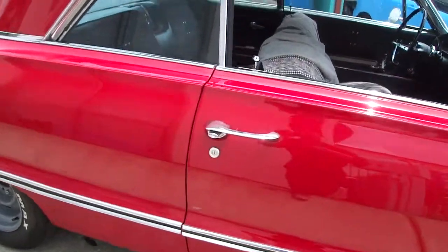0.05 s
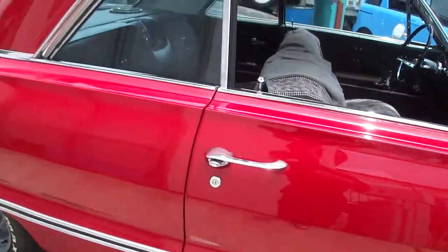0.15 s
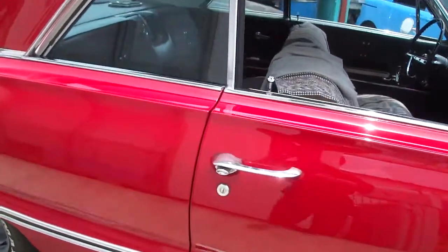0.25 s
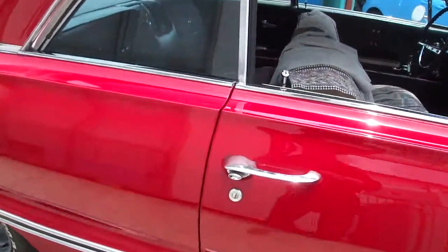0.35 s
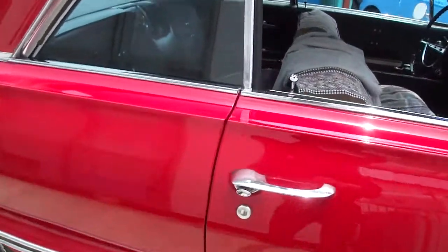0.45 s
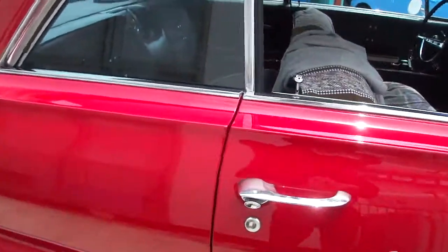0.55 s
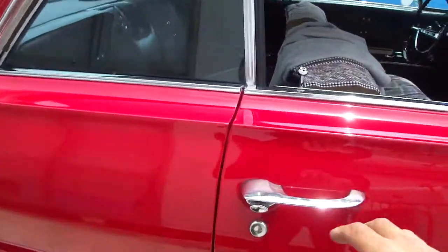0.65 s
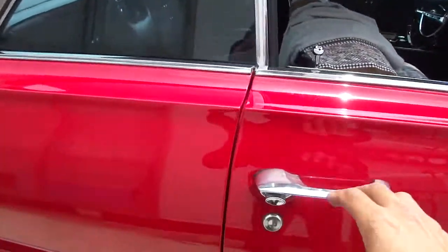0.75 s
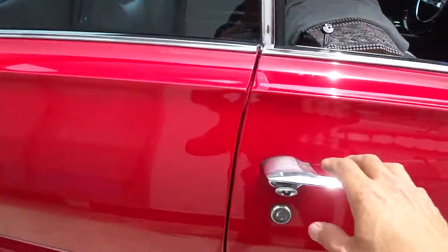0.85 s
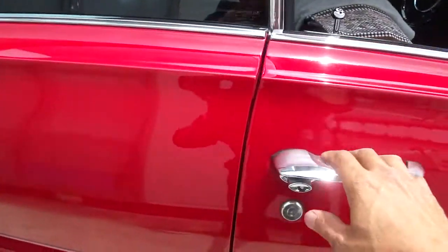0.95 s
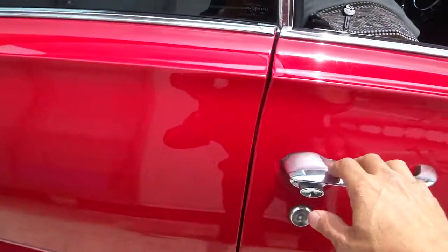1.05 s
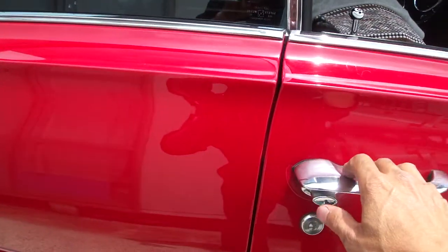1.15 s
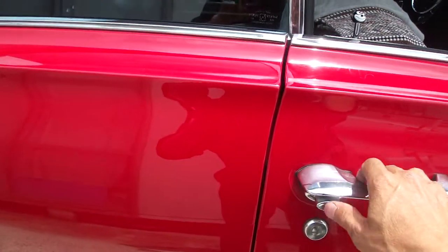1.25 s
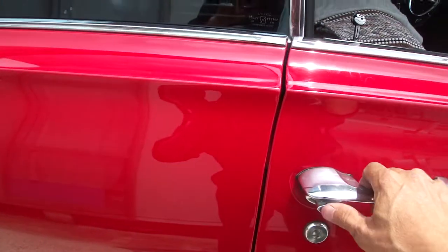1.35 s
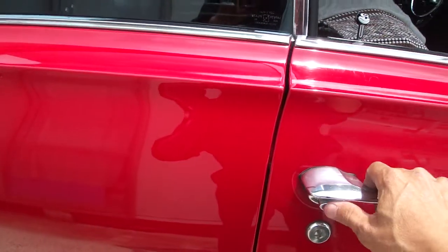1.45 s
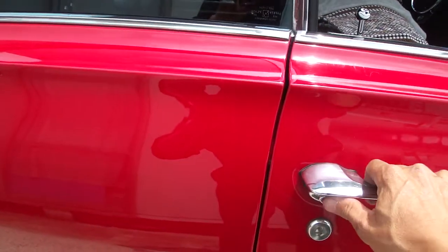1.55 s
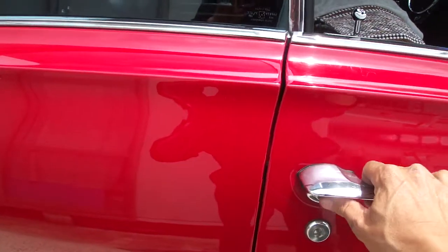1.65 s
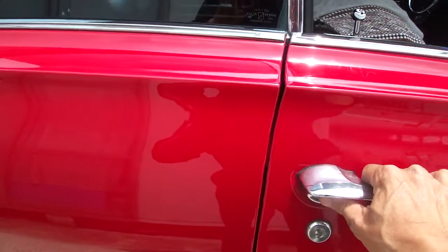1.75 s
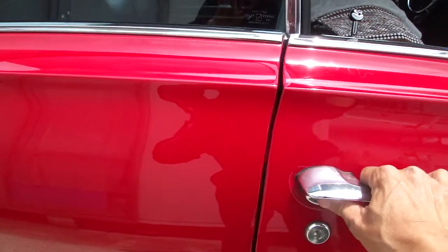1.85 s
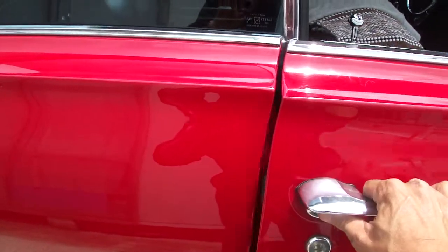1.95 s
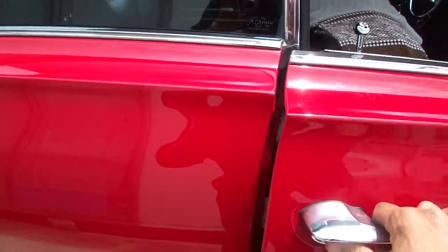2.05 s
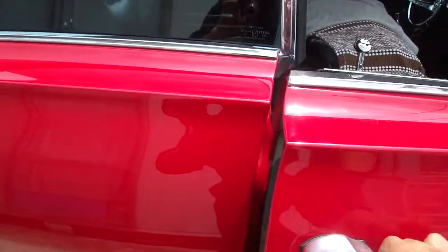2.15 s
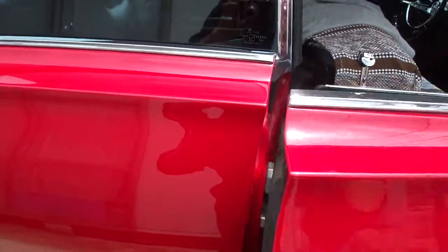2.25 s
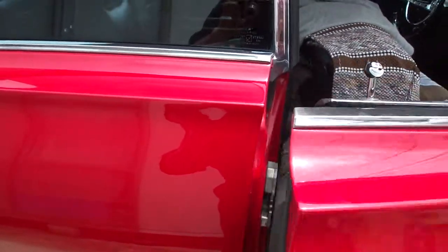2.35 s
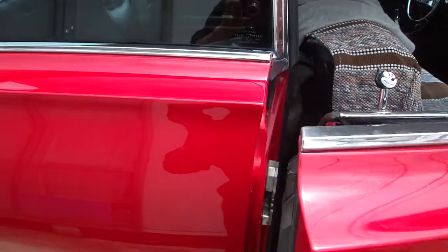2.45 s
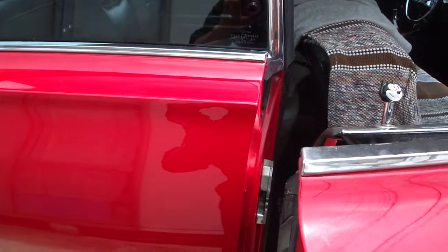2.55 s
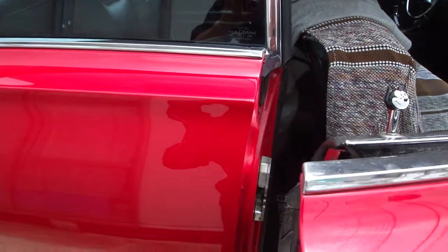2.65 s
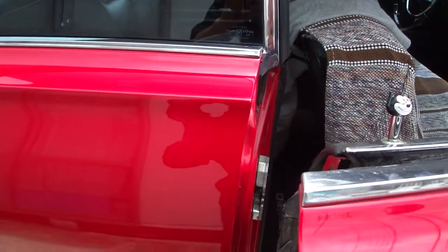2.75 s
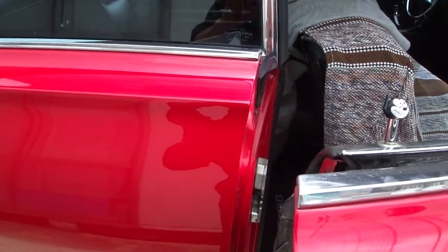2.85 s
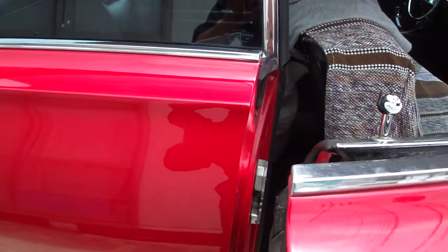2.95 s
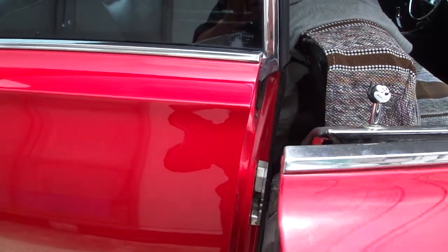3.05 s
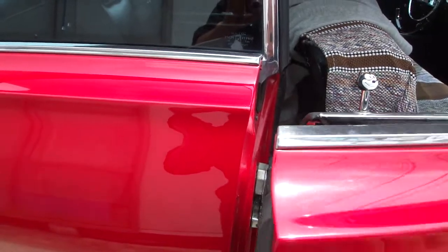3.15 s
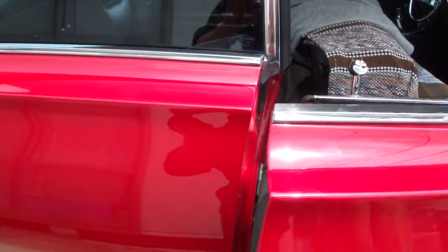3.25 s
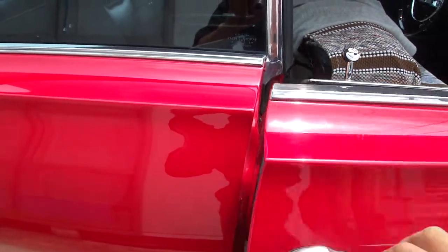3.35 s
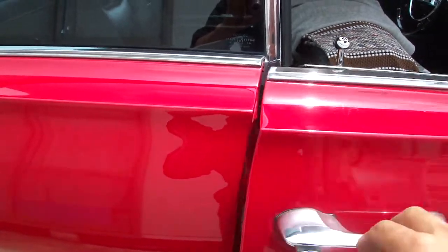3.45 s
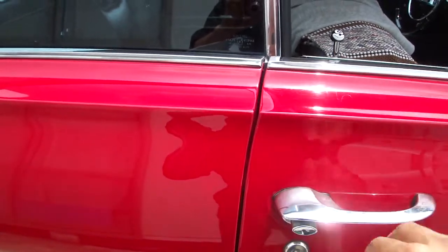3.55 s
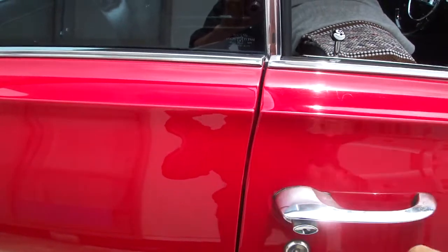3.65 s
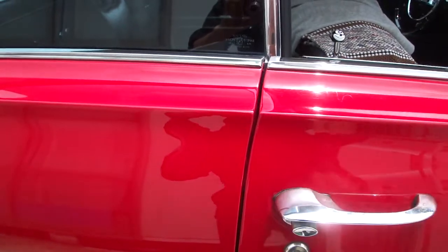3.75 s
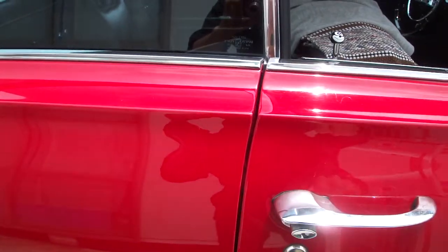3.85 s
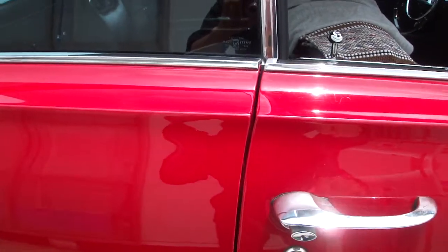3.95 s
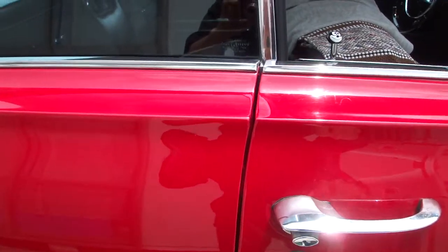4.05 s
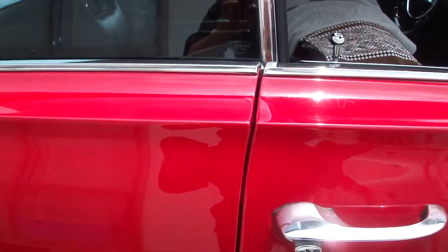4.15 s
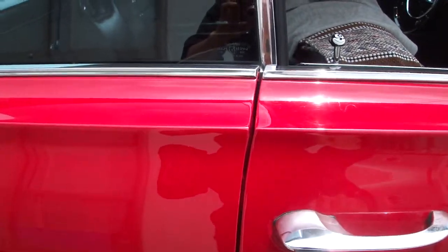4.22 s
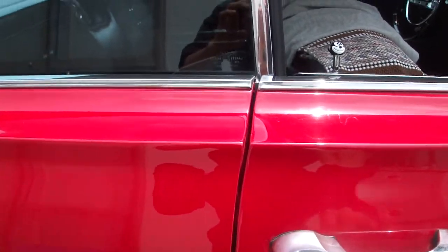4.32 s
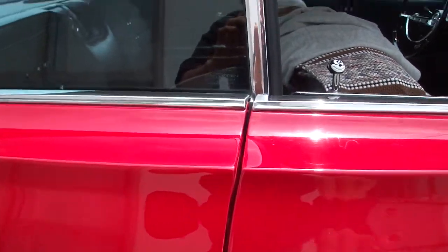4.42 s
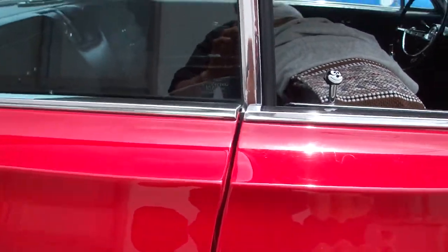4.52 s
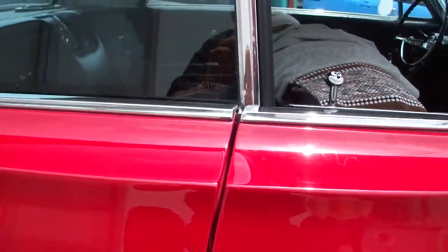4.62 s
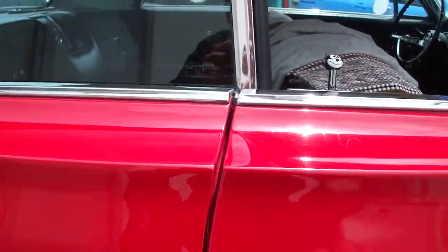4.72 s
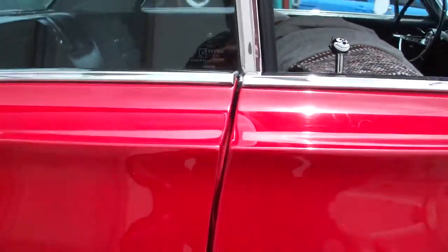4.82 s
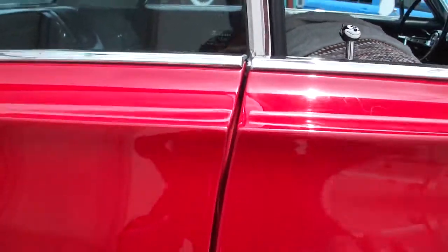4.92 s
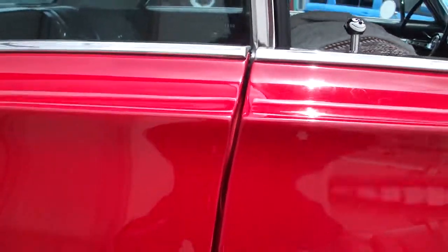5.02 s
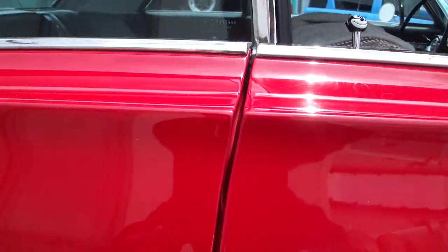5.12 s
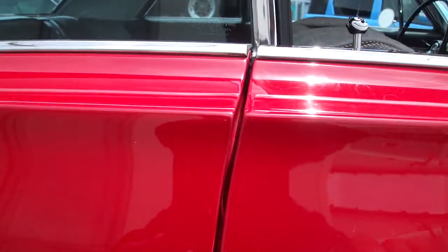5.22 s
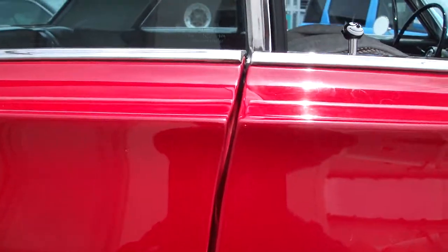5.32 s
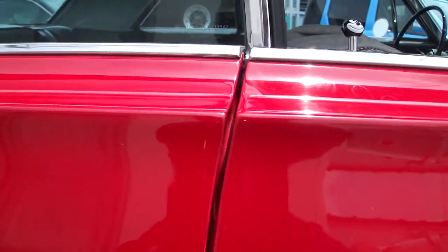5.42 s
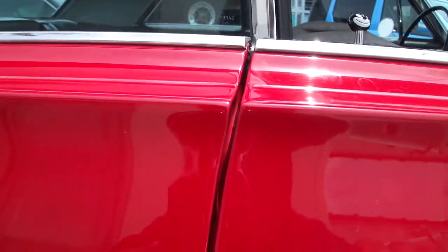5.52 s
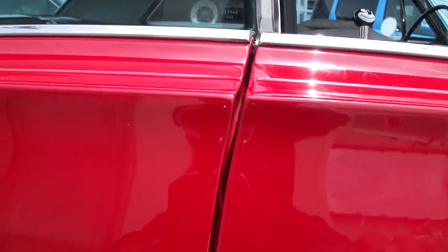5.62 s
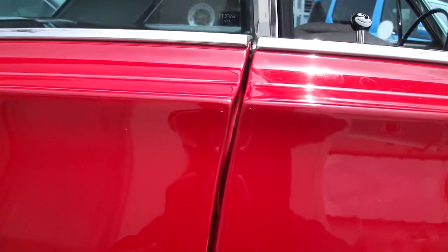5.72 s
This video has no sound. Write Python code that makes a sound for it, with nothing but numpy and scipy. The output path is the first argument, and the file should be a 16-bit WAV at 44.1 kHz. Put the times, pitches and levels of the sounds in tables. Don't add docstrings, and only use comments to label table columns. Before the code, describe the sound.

Outdoors in a yard with a wash of far traffic and machinery, a thumb works the metal button of a heavy car door: small clunks, a pause, sharper clicks, then the latch lets go with a loud clack. About a second later the door slams hard, a rattling burst with a low boom. The close handheld stereo microphone also picks up tiny lens-motor ticks and a finger knock on its plastic body.

```python
import sys
import numpy as np
from scipy import signal
from scipy.fft import rfft, irfft
from scipy.io import wavfile
from scipy.ndimage import uniform_filter1d

SR = 44100
rng = np.random.default_rng(int(sys.argv[2]) if len(sys.argv) > 2 else 0)


def volts_from_decibels(level):
    exponent = np.asarray(level, float) / 20
    return 10 ** exponent


def transcribe(signal):
    frames = np.atleast_2d(signal).T
    limited = np.clip(frames, -1, 1)
    pcm = np.round(limited * 32767).astype(np.int16)
    wavfile.write(sys.argv[1], SR, pcm)


N = 254898


def add(mix, s, sound):
    part = mix[..., round(s * SR):][..., :sound.shape[-1]]
    part += sound[..., :part.shape[-1]]


def evened(x):
    return x / np.sqrt(np.mean(x ** 2) + 1e-20)


def read(points, hz):
    f, value = np.transpose(points)
    return np.interp(np.log(hz + 1), np.log(f + 1), value)


def bump(hz, centre_hz, width_hz):
    return 1 / (1 + (2 * (hz - centre_hz) / width_hz) ** 2)


def rings(modes, rise, size):
    t = np.arange(size) / SR
    tone = sum(volts_from_decibels(db - 60 * t / t60) * np.sin(2 * np.pi * hz * t) for hz, db, t60 in modes)
    return tone * (1 - np.exp(-(t / rise) ** 2))


def coloured(x, db):
    log_gain = np.log(volts_from_decibels(np.r_[db, db[-2:0:-1]]))
    response = np.exp(np.conj(signal.hilbert(log_gain)))
    taps = np.fft.ifft(response).real[:len(db)]
    return signal.oaconvolve(x, taps[None] / np.linalg.norm(taps), axes=1)[:, :N]


def pair():
    return rng.standard_normal((N, 2)).T


def yard():
    # t/s, traffic level/dB, nearness of the machine/dB
    activity = [(0, -1.5, -2.5), (.4, -2.5, 0.5), (.95, -3, -1.5), (1.2, -6.5, -5), (1.7, -1, -3.5),
                (2.2, -5, 0), (2.5, -7.5, -5.5), (3.06, -8, -6.5), (3.3, -5.5, -3), (3.9, -5.5, -3),
                (4.2, -9.5, -10), (4.65, -5.5, -9), (4.95, -3.5, -16.5), (5.35, -4.5, -17), (5.78, -2, -16)]
    # f/Hz, level/dB per Hz
    mid_colour = [(15, -67), (25, -48), (38, -32), (125, -8.5), (202, -6.5), (237, -7.5), (278, -12.5),
                  (515, -11), (1350, -2), (1720, -21.5), (2500, -18), (3010, -23), (4750, -26.5),
                  (7890, -42.5), (15000, -60)]
    side_colour = [(15, -81), (25, -49), (172, -16), (438, -19), (769, -12.5), (952, -7.5), (1090, -6),
                   (1460, 2.5), (1720, -13), (2500, -12.5), (2930, -24), (3830, -19), (5570, -36),
                   (7890, -39.5), (15000, -68)]
    # f/Hz, share
    side_lean = [(60, 0.14), (200, 0.46), (700, -0.2), (1270, 0.6), (2340, -0.76), (4300, 0.19),
                 (8000, -0.38)]
    # f/Hz, width/Hz, middle level/dB, difference level/dB
    casing = [(208, 25, -1.5, -2.5), (653, 124, 5, 3), (1454, 195, 7.5, 3.5), (2512, 60, 7.5, 3),
              (3990, 200, 5, -0.5), (4750, 370, 5.5, 4), (5630, 200, -8.5, 3), (6000, 570, 1, 2),
              (7760, 660, 3.5, -3), (2080, 190, 4.5, -3.5)]
    roar_shares = (0.13, 0.29)
    hiss_shares = (0.39, 0.22)

    frames, hz = N // 256 + 5, np.fft.rfftfreq(1024, 1 / SR)
    a, b, c, d, patches = rng.standard_normal((frames, 513, 5)).T
    patches = uniform_filter1d(uniform_filter1d(patches, 10, 0), 10, 1)
    patches = 2.5 * evened(patches)
    s, *levels = np.transpose(activity)
    drive = np.array([np.interp(np.arange(frames) * 256 / SR, s, v) for v in levels])
    traffic, whirr = drive
    rumble = traffic + 8.5
    roar, hiss = np.dot(roar_shares, drive), np.dot(hiss_shares, drive)

    f = hz[:, None]
    deep = 1 / (1 + (f / 90) ** 4)
    low = 1 / (1 + (f / 450) ** 4)
    upper = 1 / (1 + (1100 / (f + 1)) ** 8)
    high = 1 / (1 + (1700 / (f + 1)) ** 8)
    top = 1 / (1 + (5200 / (f + 1)) ** 6)
    outer = (low - 0.85 * deep) * rumble + (1 - low - upper) * roar
    outer = outer + (upper - high) * whirr
    outer = outer + high * (1 - top) * hiss
    outer = outer + patches - 2.93 * low - 4.5 * deep - 8.6 * bump(f, 15400, 3200)
    outer = outer + 0.47 * bump(f, 2530, 250) * (whirr - hiss)

    mid_db = read(mid_colour, hz) + sum(m * bump(hz, f0, w) for f0, w, m, _ in casing)
    side_db = read(side_colour, hz) + 1.5 + sum(v * bump(hz, f0, w) for f0, w, _, v in casing)
    lean = np.clip(read(side_lean, hz), -1, 1)[:, None]
    mid = (a + 1j * b) * volts_from_decibels(mid_db[:, None] + outer)
    side = lean * (a + 1j * b) + np.sqrt(1 - lean ** 2) * (c + 1j * d)
    uneven = 0.21 * (1 - low) * (0.5 - top) * (whirr - roar)
    side = side * volts_from_decibels(side_db[:, None] + outer + uneven)
    out = signal.istft(np.array([mid + side, mid - side]), nperseg=1024, noverlap=768)[1][:, :N]
    return volts_from_decibels(-35.5) * out / np.std(out[:, :SR // 4])


def machines():
    # f/Hz, width/Hz
    hums = [
        (235, 1),
        (410, 6),
    ]
    # t/s, first hum level/dB, second hum level/dB
    hum_levels = [(0, -50.5, -59), (1.4, -55, -72), (1.9, -98, -67), (3, -65.5, -55.5), (4.5, -69, -63.5),
                  (5.78, -57, -61.5)]
    s, *levels = np.transpose(hum_levels)
    hz, t = np.fft.rfftfreq(N, 1 / SR), np.arange(N) / SR
    out = np.zeros(N)
    for (f, width), db in zip(hums, levels):
        line = evened(irfft(rfft(rng.standard_normal(N)) * bump(hz, f, width), N))
        out += line * volts_from_decibels(np.interp(t, s, db))
    return out


def lens():
    # t/s, effort peak level/dB, loaded phase/steps (wraps every 4), pull of opposite phase/dB
    steps = [(0, -40, 0.7, -11), (.45, -41, 0.8, -8), (.65, -46.5, 0.87, 0), (.92, -40, 0.81, -8),
             (1.05, -47, 0.11, 2), (1.25, -41, -1.4, -14), (1.6, -42.5, -1.4, -9.5), (1.9, -48, 0.4, -3),
             (2.25, -43, 0.33, -14), (2.8, -48.5, 0.097, 0), (3.4, -43, 0.5, -16), (3.8, -42, 0.54, -1),
             (3.95, -42.5, -1.15, -7), (4.55, -42.5, -1.1, -7), (4.7, -42.5, -1, 0),
             (4.9, -45.5, -1.05, -5), (5.3, -41.5, -1.2, -11), (5.5, -36.5, -1, -4), (5.78, -44, -1, 5)]
    # f/Hz, level/dB, t60/s
    step_ring = [(5796, 2.5, 0.0059), (6810, -5.5, 0.01), (7760, 0.5, 0.0054), (5360, 2, 0.0041),
                 (11000, -18.5, 0.0049)]
    # t/s, rms level/dB
    whine_levels = [(0, -60.5), (1.5, -66), (2.1, -84), (2.6, -72), (3.1, -61.5), (4.5, -68), (5.78, -66.5)]
    first_s, rate_hz, phases = .0153, 59.94, 4
    fall_db = 29.5
    spread_db, colour_db = 1.2, 1.8

    times = np.arange(first_s, N / SR, 1 / rate_hz)
    s, *controls = np.transpose(steps)
    effort_db, loaded, opposite_db = (np.interp(times, s, v) for v in controls)
    away = np.sin(np.pi * (np.arange(len(times)) - loaded) / phases) ** 2
    pull = volts_from_decibels(-fall_db * away) + volts_from_decibels(opposite_db - fall_db * (1 - away))
    pull = volts_from_decibels(effort_db) * pull
    chance, ticks = rng.standard_normal((len(times), 1 + len(step_ring))), np.zeros(N)
    for k, at in enumerate(times):
        modes = [(hz, db + colour_db * c, t60) for (hz, db, t60), c in zip(step_ring, chance[k, 1:])]
        strength = pull[k] * volts_from_decibels(3.5 + spread_db * chance[k, 0])
        add(ticks, at, strength * rings(modes, 0.00043, size=400))

    t = np.arange(N) / SR
    gate = uniform_filter1d(((t - first_s) * rate_hz % 2 > 1.15) * 1., 80)
    waver = 1 + .5 * evened(uniform_filter1d(rng.standard_normal(N), 300))
    whine = np.sqrt(2) * np.sin(2 * np.pi * 4780 * t) * gate * waver
    whine = whine * volts_from_decibels(np.interp(t, *np.transpose(whine_levels)))
    return ticks * volts_from_decibels(np.array([[-5.], [0.]])) + whine * volts_from_decibels(np.array([[.1], [-2.]]))


def fingers():
    # t/s, peak level/dB, length/s, rub level/dB, nail tick level/dB
    contacts = [
        (0.012, -41, .002, -10, 11),
        (0.023, -44, .005, -3, 10),
        (4.641, -16, 0.0021, -12, -11),
        (4.6429, -22, 0.0016, -13, -25),
        (4.682, -40, 0.002, -7, 7),
    ]
    # f/Hz, level/dB, t60/s, difference level/dB
    body_ring = [(1316, 4.5, 0.018, 2), (750, -0.5, 0.012, -5), (2150, -2, 0.0073, 12),
                 (3700, -13, 0.0034, 11), (4630, -16, .004, 0)]
    # t/s, level/dB, f/Hz, t60/s
    creaks = [
        (4.657, -40, 1325, .06),
        (4.667, -36, 1330, .05),
        (4.676, -30, 1330, .05),
        (4.683, -31, 2290, 0.017),
    ]
    nail_hz, nail_t60 = 1900, 0.019

    push, ticks, t = np.zeros(N), np.zeros((2, N)), np.arange(1000) / SR
    for s, db, length, rub_db, nail_db in contacts:
        rub = volts_from_decibels(rub_db) * rng.standard_normal(4000)[:round(length * SR)] * 0.16
        rub *= signal.windows.tukey(len(rub), .4)
        rub[0] = 1
        add(push, s, volts_from_decibels(db) * rub)
        nail = volts_from_decibels(db + nail_db - 60 * t / nail_t60) * rng.standard_normal((1000, 2)).T
        add(ticks, s + 0.0011, nail)
    mid_ring = rings([m[:3] for m in body_ring], 0.0018, size=2000)
    mid = signal.oaconvolve(push, mid_ring)[:N]
    for s, db, hz, t60 in creaks:
        add(mid, s, rings([(hz, db, t60)], .003, size=3000))
    side_ring = rings([(f * 1.06, db + v, t60) for f, db, t60, v in body_ring], .0018, size=2000)
    side = signal.oaconvolve(push, side_ring)[:N]
    nail_band = signal.butter(2, [nail_hz, 2.43 * nail_hz], "band", fs=SR, output="sos")
    return np.array([mid + side, mid - side]) + signal.sosfilt(nail_band, ticks)


def scuff():
    # f/Hz, level/dB per Hz
    slide_colour = [(530, -53), (900, -16), (1340, 1.5), (1450, -6.5), (1780, -9.5), (3100, -24),
                    (3640, -14), (4190, -32), (6830, -27), (12000, -52), (15600, -81), (22000, -120)]
    start_s, length_s, level_db = 5.325, 0.078, -42
    stroke = np.zeros(N)
    add(stroke, start_s, volts_from_decibels(level_db) * signal.windows.tukey(round(length_s * SR), .7))
    a, b = stroke * coloured(pair(), read(slide_colour, np.fft.rfftfreq(2048, 1 / SR)))
    return np.array([a + 2.0 * b, a - 1.7 * b])


def shell():
    # t/s, rms level/dB, rise/s, t60/s
    booms = [
        (1.71, -35, 0.011, 0.31),
        (2.14, -25.5, 0.05, 0.37),
        (3.525, -23, 0.05, 0.36),
        (3.588, -16, 0.024, 0.5),
        (3.72, -39, 0.065, 0.5),
    ]
    # t/s, peak level/dB, f/Hz
    flexes = [(1.54, -30, 410), (1.721, -37, 157), (1.74, -32, 335), (2.141, -28, 315), (2.19, -28, 204),
              (2.219, -32, 299), (3.527, -32, 164), (3.596, -16.5, 240), (3.6, -28, 114),
              (3.61, -15.5, 342), (3.612, -20, 465), (3.628, -17.5, 209), (3.645, -21.5, 165),
              (3.684, -25, 232), (3.725, -29.5, 246), (3.752, -29.5, 194)]
    # f/Hz, level/dB per Hz
    boom_colour = [(15, -71), (25, -34), (59, -17.5), (129, -1.5), (206, -2.5), (362, -5.5), (555, -6.5),
                   (671, -1.5), (769, -15), (824, -10), (1500, -20), (1950, -31), (3300, -120)]
    swell, thuds, t = np.zeros(N), np.zeros(N), np.arange(SR) / SR
    for s, db, rise, t60 in booms:
        add(swell, s, volts_from_decibels(db - 60 * t / t60) * (1 - np.exp(-(t / rise) ** 2)))
    for s, db, hz in flexes:
        t60 = 0.093 * (200 / hz) ** 0.26
        add(thuds, s, rings([(hz, db + 5.5, t60)], 0.008, size=SR // 2))
    return thuds, swell * coloured(pair(), read(boom_colour, np.fft.rfftfreq(8192, 1 / SR)))


def snaps():
    # t/s, peak level/dB, ring f/Hz, crack level/dB
    contacts = [(1.4965, -43, 4770, -27), (1.5438, -37.5, 5000, -25), (1.549, -36, 4700, -30),
                (1.918, -33.5, 3780, -25), (1.923, -38, 5200, -24.5), (2.1282, -17.5, 4960, -41),
                (2.132, -30, 3380, -16), (2.144, -24, 5200, -23), (3.521, -18.5, 5020, -13.5),
                (3.546, -23, 5100, -17), (3.572, -27, 4700, -16)]
    ring_t60, crack_t60, crack_hz = 0.015, 0.0065, 6960
    ring, spit, t = np.zeros(N), np.zeros(N), np.arange(1000) / SR
    for s, db, hz, crack_db in contacts:
        add(ring, s, rings([(hz, db, ring_t60)], 0.00067, size=1000))
        add(spit, s, volts_from_decibels(db + crack_db + 6 - 60 * t / crack_t60))
    bright = signal.butter(2, crack_hz, "high", fs=SR, output="sos")
    return ring, signal.sosfilt(bright, pair() * spit)


def latch(rows, plate, colour, rise, hold, mute, ring_t60, upper_db, skin_db, treble_t60,
          fizz_db, crack_db, rattle_db, t60):
    # f/Hz, width/Hz, level/dB
    skin = [(684, 38, 3), (700, 31, -13), (835, 18, 13), (930, 40, 2.5), (1170, 20, 7), (1370, 17, 3.5),
            (1474, 8.5, -4), (2176, 38, -1.5), (3000, 140, 0)]
    harder_brighter = np.array([[1.], [1.1], [2.3]])
    rattle_with_plate = np.array([[.22], [.45], [.45]])

    clean, shake = np.zeros(N), np.zeros((3, N))
    t, knock_t = np.arange(SR // 2) / SR, np.arange(4000) / SR
    damping = 1 - np.clip(mute, 0, 1) * (1 - np.exp(-(knock_t / hold) ** 4))
    lasting = t60 * np.array([[1], [treble_t60], [0.2 * treble_t60]])
    shifts = 1 + .018 * rng.standard_normal((len(rows), len(plate)))
    for (s, peak_db, hz, plate_db), shift in zip(rows, shifts):
        knock = rings([(hz, 0, ring_t60), (1.537 * hz, upper_db, ring_t60)], rise, size=4000)
        knock = knock * damping
        add(clean, s, volts_from_decibels(peak_db - 3.0) * knock / abs(knock).max())
        plate_modes = [(f * k, d, plate_t60) for (f, d, plate_t60), k in zip(plate, shift)]
        add(clean, s, volts_from_decibels(peak_db + plate_db) * rings(plate_modes, 0.0005, size=4000))
        shake_db = harder_brighter * peak_db + rattle_db + rattle_with_plate * plate_db
        add(shake, s, volts_from_decibels(2 * (shake_db - 60 * t / lasting)))
    body, fizz, crack = np.sqrt(signal.lfilter([1 / 40], [1, -39 / 40], shake))

    hz = np.fft.rfftfreq(8192, 1 / SR)
    skin_power = sum(volts_from_decibels(2 * (skin_db + d)) * bump(hz, f, w) for f, w, d in skin)
    db = read(colour, hz) + 10 * np.log10(1 + skin_power)
    grit = pair() * volts_from_decibels(0.89 * uniform_filter1d(rng.standard_normal(N), 60) * np.sqrt(60))
    low = signal.sosfilt(signal.butter(2, 3000, fs=SR, output="sos"), grit)
    top = signal.sosfilt(signal.butter(4, 9000, "high", fs=SR, output="sos"), grit)
    rattle = low * body + (grit - low - top) * fizz * volts_from_decibels(fizz_db) + top * crack * volts_from_decibels(crack_db)
    return clean, coloured(rattle, db)


def handle():
    # t/s, peak level/dB, ring f/Hz, plate ring level/dB
    blows = [(1.4975, -15, 773, -14), (1.5015, -21.5, 980, -1), (1.505, -21.5, 990, -4),
             (1.515, -29, 900, -5), (1.527, -21, 1000, -15), (1.5345, -16, 820, -21),
             (1.54, -11.5, 760, -21), (1.5435, -10.5, 775, -21), (1.547, -17.5, 934, -19),
             (1.554, -21, 910, -29), (1.7145, -20, 810, -16), (1.7215, -19.5, 810, -15),
             (1.726, -20.5, 844, -20), (1.738, -23.5, 595, -22), (1.742, -23, 660, -22),
             (1.756, -26, 895, -18), (1.891, -24, 865, -14), (1.896, -21.5, 940, -18),
             (1.901, -19.5, 1130, -11), (1.908, -27, 1170, -18), (1.9162, -9.5, 1215, -19),
             (1.9225, -5.5, 1058, -19.5), (1.929, -16, 1026, -24), (1.935, -19, 1030, -18),
             (1.974, -16.5, 1350, -19), (1.998, -7.5, 1170, -43), (2.006, -17, 1170, -34),
             (2.019, -12.5, 1150, -36), (2.033, -8.5, 1152, -37), (2.039, -19, 1220, -40),
             (2.045, -13, 1170, -28), (2.052, -22, 1200, -32), (2.057, -22, 1210, -40)]
    # f/Hz, level/dB, t60/s
    plate = [(1900, -3, 0.01), (2420, -1, 0.018), (2920, -4.5, 0.013), (4680, -10, 0.0089)]
    # f/Hz, level/dB per Hz
    colour = [(88, -50), (150, -29), (336, -7.5), (713, -1), (810, -4.5), (1190, -3.5), (1570, -22.5),
              (2350, -16), (3320, -39), (5260, -38), (12000, -80), (15600, -105), (22000, -120)]
    button_db = -3.5
    return latch(np.add(blows, [0, button_db, 0, 0]), plate, colour, rise=0.0018, hold=0.0041, mute=0.67,
                 ring_t60=0.035, upper_db=-24.5, skin_db=0.5, treble_t60=0.68, fizz_db=19.0,
                 crack_db=11, rattle_db=-16.5, t60=0.12)


def release():
    # t/s, peak level/dB, ring f/Hz, plate ring level/dB
    blows = [(2.1272, -4.5, 786, -19), (2.1335, -7, 1450, -7.5), (2.1365, -15, 990, -9),
             (2.1415, -9, 1380, -3.5), (2.1465, -13.5, 1190, -12), (2.1525, -8, 1410, -17),
             (2.158, -15, 800, -17), (2.164, -17, 1180, -11), (2.171, -20.5, 1200, -15),
             (2.179, -26, 1290, -12), (2.282, -29, 1420, -32)]
    # f/Hz, level/dB, t60/s
    plate = [(2000, -3, 0.027), (2290, -6, 0.028), (5010, -14, 0.0092)]
    # f/Hz, level/dB per Hz
    colour = [(88, -55), (150, -14), (364, -17.5), (450, 1.5), (515, -6.5), (818, -3.5), (1160, 1),
              (1300, -14), (1460, 5), (1770, -9), (2060, -8.5), (5100, -21.5), (15000, -70)]
    return latch(blows, plate, colour, rise=0.0011, hold=.003, mute=0.84, ring_t60=0.017, upper_db=-8,
                 skin_db=-3.5, treble_t60=0.95, fizz_db=8.5, crack_db=14, rattle_db=-10.0, t60=0.11)


def slam():
    # t/s, peak level/dB, ring f/Hz, plate ring level/dB
    blows = [(3.5198, -3.5, 780, -19), (3.525, -7.5, 1180, -5), (3.531, -10, 910, -10),
             (3.536, -5.5, 1210, -12), (3.539, -2, 970, -16), (3.5452, -2.5, 840, -14),
             (3.549, -9, 1100, 0), (3.561, -12, 1190, -9), (3.567, -8.5, 990, -12), (3.5707, -1.5, 752, -1),
             (3.581, -19, 670, -4), (3.597, -12.5, 980, 2), (3.606, -10, 770, -5), (3.611, -10.5, 700, -11),
             (3.617, -5, 800, -20), (3.624, -4.5, 820, -22), (3.637, -10.5, 830, -31),
             (3.646, -13, 624, -3), (3.655, -10.5, 700, -6.5), (3.661, -12, 910, -18),
             (3.675, -18, 530, -9), (3.697, -18, 510, -2.5), (3.708, -20, 790, -7), (3.721, -25.5, 513, 0),
             (3.746, -25.5, 730, -4.5), (3.752, -23, 670, -10), (3.774, -29.5, 684, -3)]
    # f/Hz, level/dB, t60/s
    plate = [(2227, -3.5, 0.029), (2300, -15, 0.078), (4830, -20, 0.005)]
    # f/Hz, level/dB per Hz
    colour = [(88, -43), (150, -11), (247, -26), (464, -5.5), (748, 0), (839, -8), (923, -8), (1020, -7),
              (1380, -2), (1800, -10), (2270, -5.5), (2850, -17), (5570, -22.5), (14500, -68.5)]
    return latch(blows, plate, colour, rise=0.0011, hold=0.0031, mute=0.68, ring_t60=0.026, upper_db=-6.0,
                 skin_db=2.0, treble_t60=0.88, fizz_db=7.5, crack_db=25.5, rattle_db=-12.5, t60=0.11)


def door():
    # f/Hz, likeness (0-1)
    likeness = [(40, 1), (150, 0.99), (600, 0.95), (1400, 0.9), (2500, 0.87), (5000, 0.62), (9000, 0.75),
                (14000, 0.3)]
    # f/Hz, level/dB
    balance = [(60, 0), (150, 0.5), (380, 2), (940, 1), (2340, -5), (5860, -5.5), (14700, -4)]
    # f/Hz, phase/radians
    lead = [(100, 0.38), (1380, -0.44), (4740, -1.08), (8000, -0.67)]
    parts = [handle(), release(), slam(), shell(), snaps()]
    clean = rfft(sum(p[0] for p in parts))
    a, b = rfft(sum(p[1] for p in parts))
    hz = np.fft.rfftfreq(N, 1 / SR)
    apart = np.sqrt(np.clip(1 - read(likeness, hz), 0, 1) / 2)
    tilt = volts_from_decibels(read(balance, hz) / 2) * np.exp(.5j * read(lead, hz))
    shared = clean + a * np.sqrt(1 - apart ** 2)
    return irfft([(shared + apart * b) * tilt, (shared - apart * b) / tilt], N)


def scene():
    return door() + yard() + machines() + lens() + fingers() + scuff()


def low_pass(x):
    return signal.sosfilt(signal.butter(12, 15260, fs=SR, output="sos"), x)


def record(dry):
    limited = dry / (1 + dry ** 8) ** (1 / 8)
    mix = signal.oaconvolve(limited, signal.firwin(127, 15200, fs=SR)[None], "same")
    return low_pass(mix)


dry = scene()
out = record(dry)
transcribe(out)
```